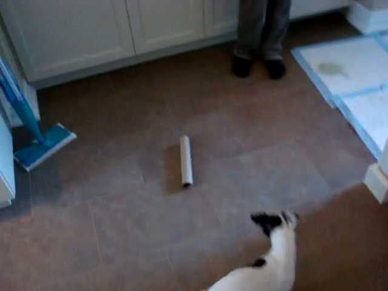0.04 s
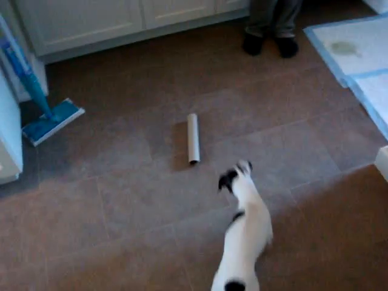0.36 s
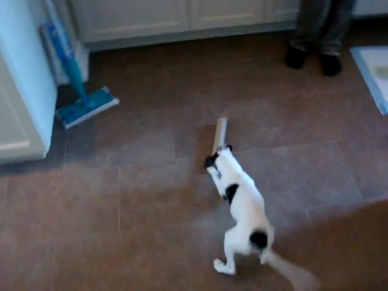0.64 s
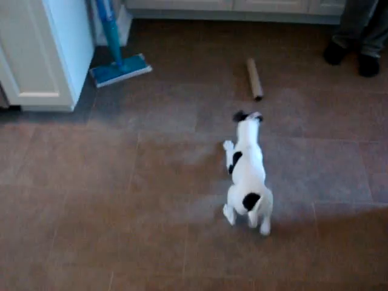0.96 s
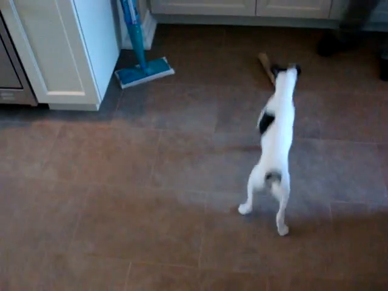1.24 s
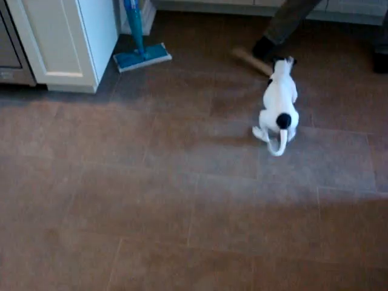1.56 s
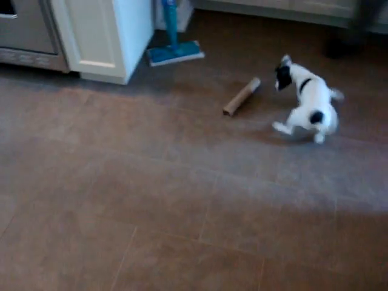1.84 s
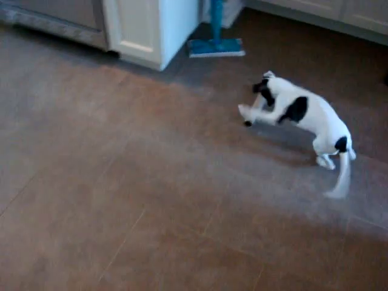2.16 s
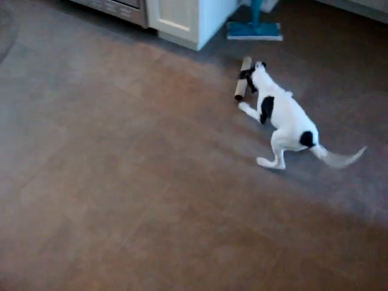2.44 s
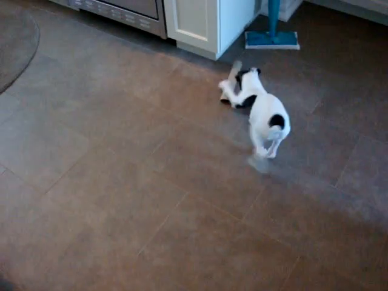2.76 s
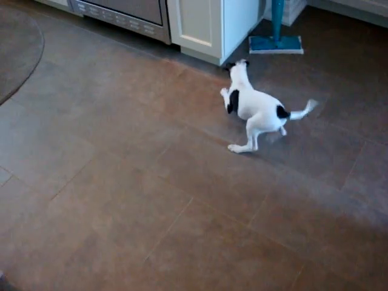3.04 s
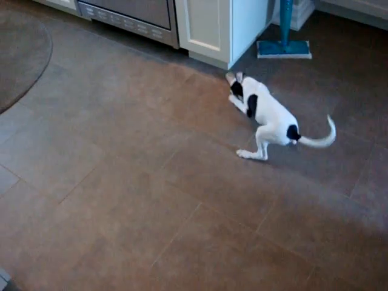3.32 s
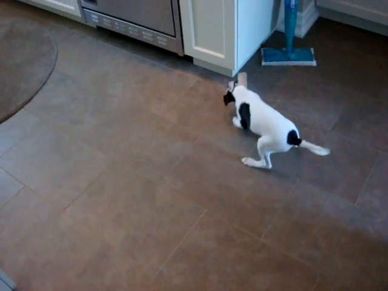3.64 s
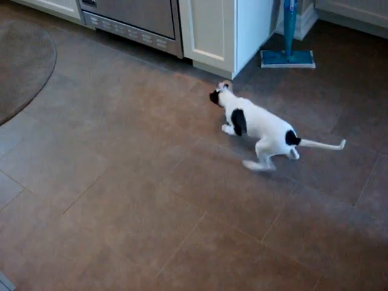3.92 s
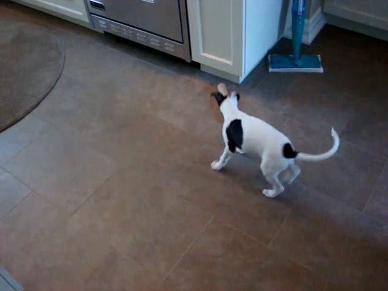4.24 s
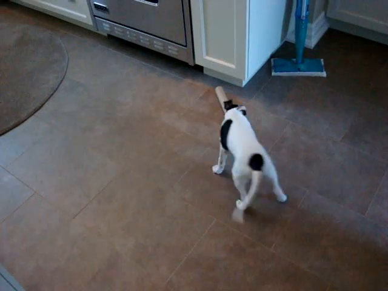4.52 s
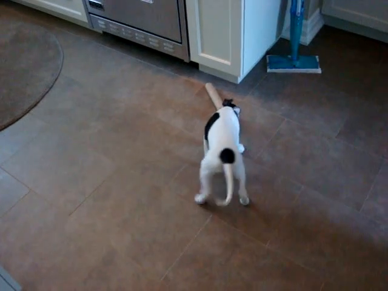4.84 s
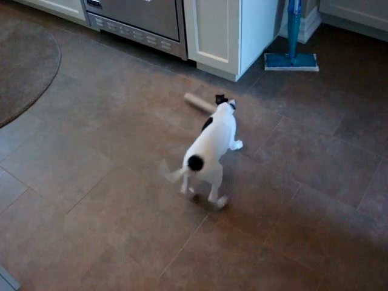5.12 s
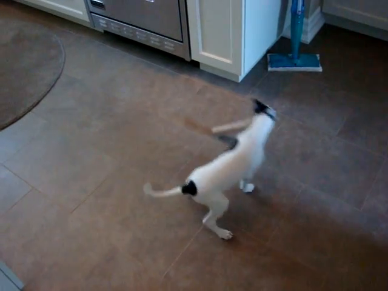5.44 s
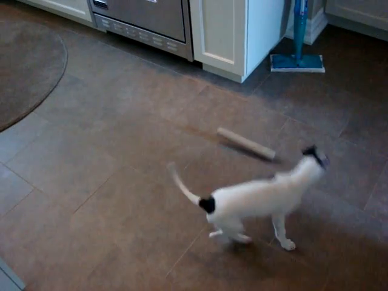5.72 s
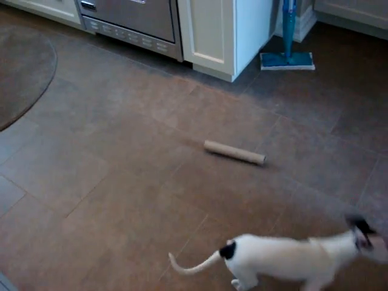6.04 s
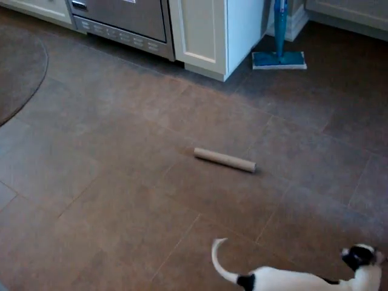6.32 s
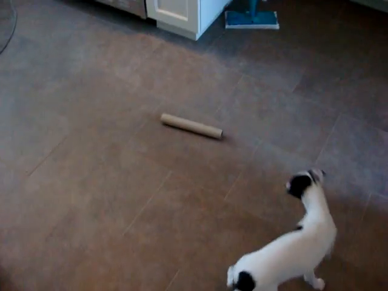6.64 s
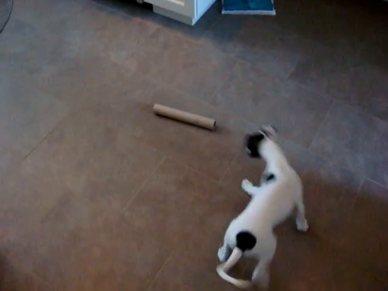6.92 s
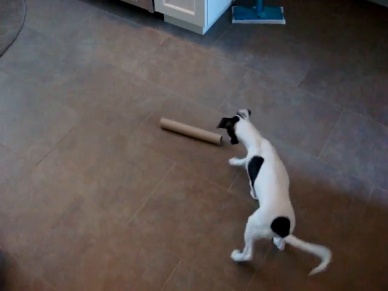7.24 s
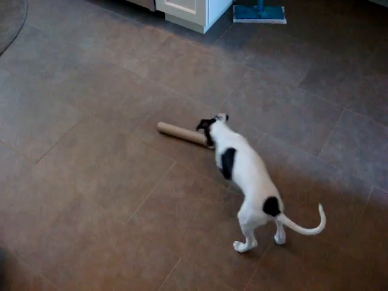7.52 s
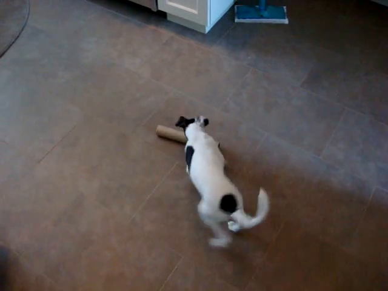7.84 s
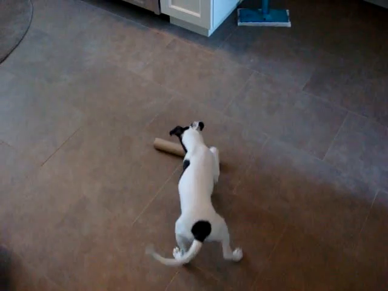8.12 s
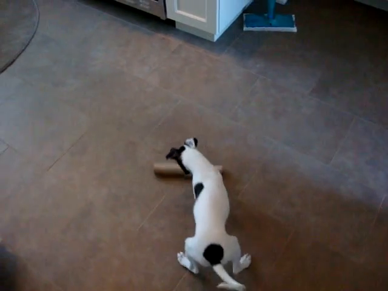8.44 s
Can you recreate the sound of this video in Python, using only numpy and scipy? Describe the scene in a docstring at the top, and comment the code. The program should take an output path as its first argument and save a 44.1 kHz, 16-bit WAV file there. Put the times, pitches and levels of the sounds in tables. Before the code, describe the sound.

In a hard, slightly ringing kitchen, a hollow cardboard tube clatters, slides and rolls over tile as a puppy plays with it. Dull paw thuds, brushy scuffs and a few tiny pad squeaks come between the knocks. A big pounce makes the tube rattle loudly, and later it drops flat with a smack and bounces. After a lull with faint air noise, one more scuffle ends the play.

```python
"""Paws scuff and thud on kitchen tile over the faint air noise of a house: a puppy is after a cardboard tube.
A pad squeaks, then the tube is batted about in bursts with quiet gaps, and pinned in one big pounce.
It knocks, rolls, scrapes and slaps flat; its air column hoots while the cardboard wall clacks.
The hard room rings after every contact."""
import sys
import numpy as np
from scipy import signal
from scipy.fft import rfft, irfft, next_fast_len
from scipy.io import wavfile
from scipy.ndimage import uniform_filter1d

SR = 44100
rng = np.random.default_rng(int(sys.argv[2]) if len(sys.argv) > 2 else 0)


def put_to_file(sound):
    """Save the sound as 16-bit audio at rate SR, in the file named by the first command-line argument."""
    columns = np.atleast_2d(sound).T  # one column per channel
    safe = np.clip(columns, -1, 1)
    whole_steps = np.round(safe * 32767)
    wavfile.write(sys.argv[1], SR, whole_steps.astype(np.int16))


N = 382347
RING = SR * 3 // 5  # samples given to one hit and its tail
TIME = np.arange(N) / SR
AGE = TIME[:RING]


def amp(db):
    """Decibels to gain."""
    return 10 ** (np.asarray(db) / 20)


def unit(x):
    """Scale to rms 1."""
    return x / np.sqrt(np.mean(x ** 2) + 1e-20)


def unit_attack(x, size=2200):
    """Scale a hit so that its first size samples have rms 1."""
    return x / np.sqrt(np.mean(x[:size] ** 2) + 1e-20)


def along(points, hz):
    """Read (Hz, value) points on a log axis."""
    f, v = np.transpose(points)
    return np.interp(np.log(hz + 1), np.log(f + 1), v)


def add(track, s, sound):
    """Mix a sound into the track at s seconds."""
    start = max(round(s * SR), 0)
    track[start:start + len(sound)] += sound[:N - start]


def eq(x, points):
    """Minimum-phase EQ through (Hz, dB) points: nothing rings ahead of an attack."""
    m = 2 * next_fast_len(len(x) // 2 + 4096)
    gain = amp(along(points, np.fft.rfftfreq(m, 1 / SR)))
    cepstrum = irfft(np.log(gain), m)
    cepstrum[1:m // 2] *= 2
    cepstrum[m // 2 + 1:] = 0
    return irfft(rfft(x, m) * np.exp(rfft(cepstrum)), m)[:len(x)]


def resonate(x, modes, tuning=1):
    """Ring x through (Hz, width, dB) resonances of alternating polarity, all retuned by one ratio."""
    m = next_fast_len(len(x) + 4096)
    f = np.fft.rfftfreq(m, 1 / SR) / tuning
    response = sum((-1) ** k * amp(db) * 1j * f * width / (hz * hz - f * f + 1j * f * width)
                   for k, (hz, width, db) in enumerate(modes))
    return irfft(rfft(x, m) * response, m)[:len(x)]


def grit(per_second, spread_db):
    """Grain texture: tiny random catches of uneven size."""
    catches = rng.random(N) < per_second / SR
    return catches * rng.choice([-1, 1], N) * amp(spread_db * rng.standard_normal(N))


def stroke(s, length, rise_s, sag_db_per_s, release_db_per_s):
    """Envelope of one sliding move: it builds, sags while it lasts, then dies."""
    age = np.maximum(TIME - s, 0)
    fade_db = -sag_db_per_s * age - release_db_per_s * np.maximum(age - length, 0)
    return np.minimum(age / rise_s, 1) * amp(np.maximum(fade_db, -120))


# Tone of the house air. Each row: frequency in Hz, gain in dB.
ROOM_TONE_EQ = [(15, -62), (25, -30), (190, -10.5), (264, -7), (322, -8.5), (365, -5.5), (404, -8.5),
                (588, -5.5), (684, -14), (775, -5.5), (1020, -13.5), (1130, -12), (1560, -18),
                (7980, -26.5), (10000, -29.5), (13000, -76), (22000, -120)]
def room_tone(level_db=-51):
    """Steady air noise of the house, a faint bed under everything."""
    return amp(level_db) * unit(eq(rng.standard_normal(N), ROOM_TONE_EQ))


# Reverb of the hard room. Each row: frequency in Hz, seconds to fall 60 dB.
KITCHEN_DECAY = [(150, 0.49), (550, 0.42), (1500, 0.52), (4000, 0.34), (10000, 0.28)]
def kitchen(wet_db, build_s=0.0011):
    """A click from one spot on the floor: direct sound, cabinet echoes and a diffuse tail."""
    hz, t, spectrum = signal.stft(rng.standard_normal(RING), SR, nperseg=256)
    decay = amp(-60 * t / along(KITCHEN_DECAY, hz)[:, None])
    tail = signal.istft(spectrum * decay, SR, nperseg=256)[1][:RING]
    tail *= 1 - np.exp(-AGE / build_s)
    path = amp(wet_db) * tail / np.linalg.norm(tail)
    echoes_s = rng.uniform(.003, 0.026, size=6)
    path[(echoes_s * SR).astype(int)] += 0.25 * rng.standard_normal(size=6)
    path[0] += 1
    return path


def heard(x, path):
    """A sound after its way through the room."""
    return signal.fftconvolve(x, path)[:len(x)]


# Bright, brushy tone of a scuff. Each row: frequency in Hz, gain in dB.
SCUFF_EQ = [(150, -27.5), (400, -1), (1200, 4), (2000, 4), (4000, 6), (7000, 3.5), (10000, -4)]
# Paws scuff the floor. Each row: start in seconds, length in seconds, relative level in dB.
SCUFF_CUES = [(0.086, 0.078, -48), (0.213, 0.16, -51), (0.504, 0.15, -56), (0.713, .09, -44.5),
              (0.873, 0.16, -43), (1.016, 0.26, -42), (1.458, 0.17, -46.5), (1.638, 0.11, -46.5),
              (2.32, 0.058, -25), (2.743, 0.021, -55), (2.898, 0.094, -34.5), (3.486, 0.23, -46.5),
              (3.837, .07, -44.5), (3.954, 0.023, -45.5), (5.046, 0.35, -40.5), (5.553, 0.018, -40.5),
              (8.05, 0.18, -56.5), (8.377, 0.066, -51.5), (8.484, 0.052, -32.5), (8.557, 0.14, -37.5)]
def scuffs():
    """Pads and claws brush the tile in fine grains: they press, ease and lift off."""
    brush = heard(grit(per_second=2600, spread_db=5.0), kitchen(wet_db=1.5))
    pressure = sum(amp(db) * stroke(s, length, rise_s=0.36 * length, sag_db_per_s=15, release_db_per_s=124)
                   for s, length, db in SCUFF_CUES)
    return amp(2.0) * pressure * unit(eq(brush, SCUFF_EQ))


# Body of a thud. Each row: multiple of its pitch, gain in dB.
THUD_EQ = [(.15, -33), (.35, -19.5), (.6, -9), (1, 5.5), (1.5, -3.5), (2.3, -1), (4.5, -5.5), (15, -24),
           (50, -62)]
# Paws land. Each row: start in seconds, relative level in dB, pitch in Hz.
PAW_CUES = [(0.113, -45, 160), (0.356, -37, 145), (0.701, -30, 173), (0.745, -48, 165), (0.81, -51, 247),
            (1.637, -31, 218), (1.675, -29.5, 233), (1.856, -31, 165), (2.325, -25, 258), (2.404, -30, 168),
            (2.759, -20.5, 254), (2.785, -25.5, 205), (3.036, -22.5, 264), (3.246, -41, 126),
            (3.444, -25.5, 260), (4.061, -27, 280), (4.197, -31, 198), (4.98, -31, 273), (5.49, -35, 275),
            (6.105, -47, 239), (7.778, -39, 292)]
def paws():
    """Soft pads land with a dull thud."""
    out = np.zeros(N)
    for s, db, hz in PAW_CUES:
        thud = eq(kitchen(wet_db=4.5, build_s=0.0044), np.multiply(THUD_EQ, [hz, 1]))
        add(out, s, amp(db - 13.5) * unit_attack(thud, size=3500))
    return out


# A pad skids on the glaze. Each row: start in seconds, level in dB, pitch in Hz.
SQUEAK_CUES = [(0.699, -45, 1630), (2.756, -36.5, 1395), (3.673, -37, 1470), (3.91, -44.5, 1590),
               (3.957, -34.5, 1430)]
def squeaks(attack_s=0.00082, decay_s=0.011, roughness=0.13):
    """A skidding pad sticks and slips at an unsteady rate for an instant."""
    out = np.zeros(N)
    for s, db, hz in SQUEAK_CUES:
        waver = unit(uniform_filter1d(rng.standard_normal(RING), size=60))
        phase = 2 * np.pi * np.cumsum(hz * (1 + roughness * waver)) / SR
        envelope = (1 - np.exp(-AGE / attack_s)) * np.exp(-AGE / decay_s)
        chirp = (np.sin(phase) + 0.45 * np.sin(2 * phase)) * envelope
        add(out, s, amp(db) * unit_attack(heard(chirp, kitchen(wet_db=-1.0))))
    return out


# Lowest note of the tube's air column. One row: pitch in Hz, width in Hz, gain in dB.
HOOT_MODE = [(556, 50.8, 0)]
def hoot(force, tuning=1):
    """The air column swells over a few cycles, then dies: two passes through its resonance."""
    return resonate(resonate(force, HOOT_MODE, tuning), HOOT_MODE, tuning)


def contact(contact_s):
    """Force of a touch: tiny catches that build up for contact_s, then let go."""
    progress = AGE / max(contact_s, 1 / SR)
    return rng.standard_normal(RING) * progress * np.exp(-progress)


# Hollow overtones of the air column. Each row: pitch in Hz, width in Hz, gain in dB.
AIR_MODES = [(845, 316, -2.5), (1043, 57, 2), (1136.5, 62, 7.5), (1243, 81, 5.5), (1633, 280, -8)]
# Clack of the cardboard wall. Each row: pitch in Hz, width in Hz, gain in dB.
WALL_MODES = [(1630, 110, -18), (2475, 80, -1.5), (2742, 206, 4), (2982, 267, 3), (3300, 370, -5)]
# Crack of the contact itself. Each row: frequency in Hz, gain in dB.
CRACK_EQ = [(100, -26), (280, -3), (800, -8.5), (2000, 2.5), (3500, -1.5), (4400, 3), (6000, -3),
            (8000, -8), (10000, -15)]
def tube(touches):
    """Each touch rings air and wall: hard ones give more clack and crack, soft ones more hoot."""
    out = np.zeros(N)
    for s, db, hard_db, hz, contact_s in touches:
        tuning = hz / HOOT_MODE[0][0]  # floor and muzzle shade the open ends and bend the note
        push = kitchen(wet_db=-1.5, build_s=0.0043)  # one clean push on the enclosed air
        rattle = heard(contact(contact_s), kitchen(wet_db=0.5, build_s=0.0035))
        scratch = heard(contact(1.01 * contact_s), kitchen(wet_db=5, build_s=0.00079))
        overtones = resonate(rattle, AIR_MODES, tuning ** 0.76)  # higher modes follow the bend part way
        clack = resonate(rattle, WALL_MODES, tuning ** 0.45)
        add(out, s, amp(db - hard_db) * unit_attack(hoot(push, tuning)))
        add(out, s, amp(db) * unit_attack(overtones))
        add(out, s, amp(db + hard_db - 1.5) * unit_attack(clack))
        add(out, s, amp(db + 1.05 * hard_db - 2.5) * unit_attack(eq(scratch, CRACK_EQ)))
    return out


# Knocks on the tube. Each row: start in seconds, strength in dB, hardness in dB, hoot pitch in Hz.
KNOCK_CUES = [(0.787, -38, 7, 595), (0.798, -38.5, -2, 540), (0.868, -39.5, 3.5, 537),
              (0.943, -41, 2.5, 550), (0.985, -44.5, 13, 538), (1.058, -45.5, 10, 540),
              (1.134, -45.5, -8, 536), (1.777, -34, -2.5, 538), (1.798, -39, -12, 543),
              (1.868, -27, 0.5, 537), (1.895, -38, -6, 506), (1.944, -47.5, 15, 514),
              (2.025, -38, 4.5, 527), (2.075, -36.5, 2, 535), (2.157, -45, -2.5, 534),
              (2.268, -49, 4.5, 562), (2.572, -39.5, 2, 548), (2.682, -41, -2, 533),
              (2.815, -26.5, 0.5, 556), (2.849, -32, -1.5, 550), (3.034, -29, -4, 560),
              (3.070, -35.5, -6, 554), (3.137, -41.5, 4, 550), (4.039, -34, -2.5, 596),
              (4.121, -40, -2.5, 524), (4.192, -31.5, 2.5, 527), (4.262, -33.5, 2.5, 507),
              (5.700, -24, -7, 567), (5.724, -25.5, -2.5, 543), (5.745, -36, -2.5, 560),
              (5.873, -39, -0.5, 583), (5.916, -40, -9.5, 551), (5.934, -34, 4.5, 552),
              (6.087, -41, -11.5, 568), (6.098, -31, 1, 523), (6.127, -35, -1, 499),
              (6.220, -29.5, -4, 542), (6.307, -38, -1, 550), (6.432, -36.5, -6, 545),
              (6.502, -50, -2, 543), (6.579, -51.5, -7, 551), (7.250, -62, 6, 548), (7.818, -46, -1.5, 524),
              (8.633, -30.5, -2.5, 575)]
def knocks(middling_contact_s=0.0016, shortening=0.42):
    """The tube strikes the tile or is hit by a claw: the harder the contact, the briefer."""
    return tube([(s, db, hard_db, hz, middling_contact_s * amp(-shortening * hard_db))
                 for s, db, hard_db, hz in KNOCK_CUES])


# The pushed tube travels. Each row: start in seconds, length in seconds, strength in dB, hardness in dB.
SLIDE_CUES = [(0.83, .3, -43.5, 3.5), (1.148, .2, -42, 1), (1.95, 0.26, -39, 0), (2.534, 0.14, -40.5, 2.5),
              (2.914, 0.079, -36, 6), (3.125, 0.23, -49.5, 5), (3.452, 0.17, -43, 6), (4.04, 0.34, -40, 1),
              (4.926, 0.18, -51.5, 9.5), (5.123, 0.064, -48, 7), (5.403, 0.12, -42.5, 7.5),
              (6.113, 0.3, -48.5, 5.5), (8.4, 0.29, -48, 7.5), (8.583, .1, -33, -0.5)]
def slides():
    """Grit and tile texture tick against the moving tube and ring it: sliding scrapes, rolling hums."""
    ticks = heard(grit(per_second=800, spread_db=4.5), kitchen(wet_db=0.0))
    scrape = (amp(-5.5) * unit(resonate(ticks, AIR_MODES))
              + amp(-6) * unit(resonate(ticks, WALL_MODES))
              + amp(-10) * unit(eq(ticks, CRACK_EQ)))
    fine_texture = heard(grit(per_second=1900, spread_db=2.0), kitchen(wet_db=-2.5))
    hum = unit(hoot(fine_texture))
    out = np.zeros(N)
    for s, length, db, hard_db in SLIDE_CUES:
        motion = stroke(s, length, rise_s=0.055, sag_db_per_s=6, release_db_per_s=101.5)
        out += motion * (amp(db + hard_db) * scrape + amp(db - hard_db) * hum)
    return out


# Rubs on the tube. Each row: start in seconds, strength in dB, hardness in dB, contact time in seconds.
RUB_CUES = [(1.635, -43, -4, .006), (3.285, -45.5, 5.5, 0.0065), (3.435, -37, 2.5, 0.0097),
            (3.668, -45.5, 5, .006), (4.588, -48.5, 6, 0.018), (4.758, -52, 3, 0.023),
            (4.975, -45, 3, 0.0072), (5.468, -41, 4, .009), (5.584, -42.5, 4, 0.004),
            (7.842, -43.5, -3, 0.0063), (8.497, -45, 9, 0.017), (8.615, -37, 3.5, 0.0061)]
def rubs(hoot_hz=556):
    """Muzzle or paw drags briefly over the cardboard, with a slower attack than a knock."""
    return tube([(s, db, hard_db, hoot_hz, contact_s) for s, db, hard_db, contact_s in RUB_CUES])


def pounce(start_s=2.311, count=10, gap_s=0.017, crest_s=0.026, crest_db=-20.5, hoot_hz=528):
    """Under both forepaws the tube chatters on the tile: a quick swell, then ever weaker contacts."""
    timing, bend = rng.standard_normal((count, 2)).T
    gaps = gap_s * np.exp(0.15 * timing)
    ages = np.cumsum(gaps) - gaps[0]
    past_crest = ages - crest_s
    strength_db = crest_db + np.minimum(106 * past_crest, -102 * past_crest)  # rise, fall in dB a second
    hard_db = 2.5 - 40 * ages  # the contacts soften as the paws smother the tube
    pitch_hz = hoot_hz * (1 + 0.064 * bend)
    contact_s = np.full(count, 0.0033)
    return tube(zip(start_s + ages, strength_db, hard_db, pitch_hz, contact_s))


# Boxy tone of the tube's side. Each row: frequency in Hz, gain in dB.
SLAP_EQ = [(30, -41), (100, -26.5), (220, -16), (450, -7.5), (640, -0.5), (850, -2.5), (1050, -11),
           (1400, -27), (3000, -18), (10000, -50)]
# The tube lands flat. Each row: start in seconds, relative level in dB.
SLAP_CUES = [(2.335, -24.5), (2.375, -22), (3.035, -50), (4.039, -40.5), (5.701, -20), (6.1, -39),
             (6.221, -38.5)]
def slaps():
    """Landing flat, the cardboard flexes once with a dull smack."""
    out = np.zeros(N)
    for s, db in SLAP_CUES:
        smack = eq(kitchen(wet_db=0.0), SLAP_EQ)
        add(out, s, amp(db - 4.0) * unit_attack(smack))
    return out


def scene():
    """Tube, puppy and room tone in one mono mix."""
    cardboard = knocks() + rubs() + pounce() + slaps() + slides()
    puppy = paws() + squeaks() + scuffs()
    return (cardboard + puppy + room_tone())[None]


def record(dry, ceiling_db=-12, top_hz=10150):
    """Automatic gain control holds down the loudest clatter; a brick-wall low-pass cuts the top."""
    loudness = np.sqrt(np.abs(uniform_filter1d(dry ** 2, size=900)))
    held = dry / (1 + (loudness / amp(ceiling_db)) ** 4) ** (1 / 4)
    m = next_fast_len(N + SR // 2)
    passband = np.fft.rfftfreq(m, 1 / SR) < top_hz
    return irfft(rfft(held, m) * passband, m)[:, :N]


dry = scene()
out = record(dry)
put_to_file(out)
```